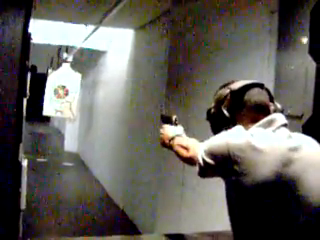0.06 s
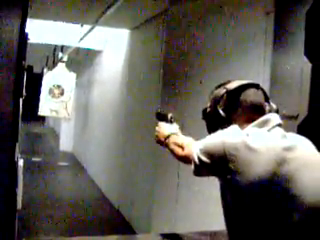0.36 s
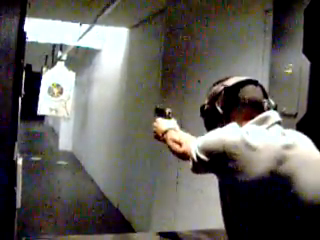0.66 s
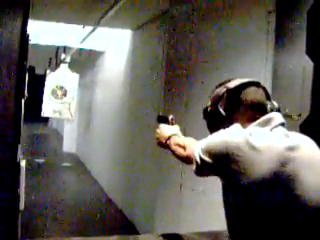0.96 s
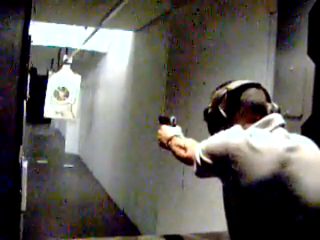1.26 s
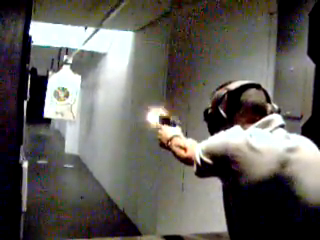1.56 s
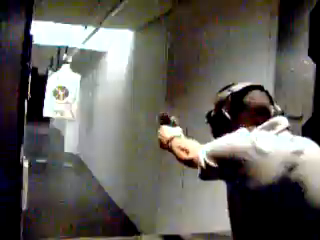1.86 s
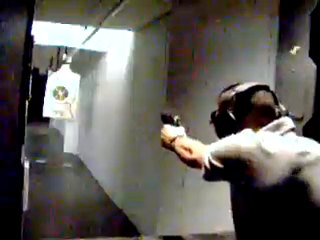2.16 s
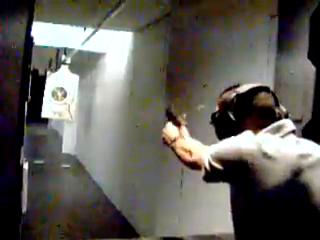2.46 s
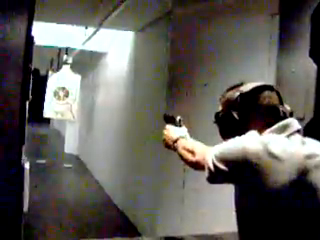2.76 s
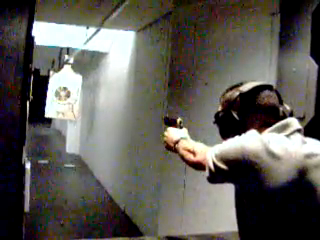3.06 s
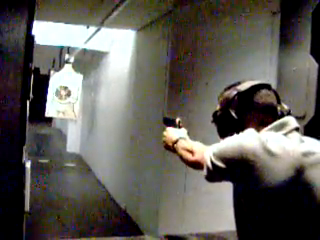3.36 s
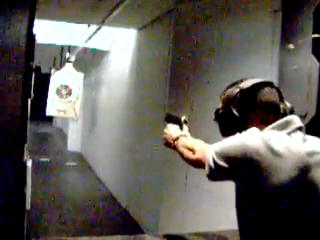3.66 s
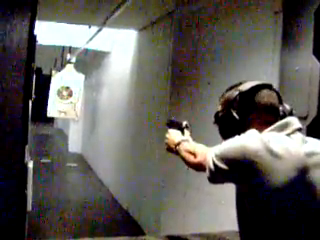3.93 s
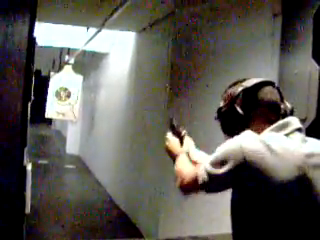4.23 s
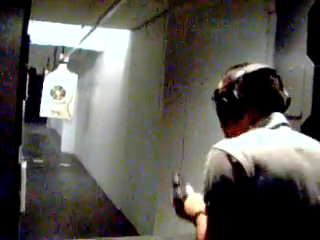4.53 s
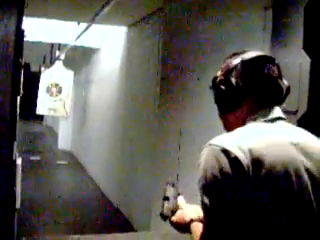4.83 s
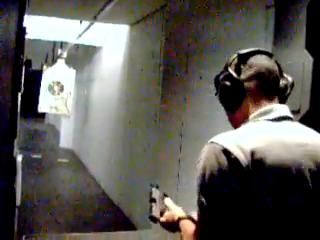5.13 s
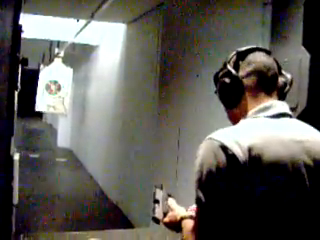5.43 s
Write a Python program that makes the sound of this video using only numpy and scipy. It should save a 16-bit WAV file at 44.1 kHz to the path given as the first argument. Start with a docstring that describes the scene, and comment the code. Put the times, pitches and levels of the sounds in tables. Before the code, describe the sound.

Close pistol shots overload a small, muffled microphone in an indoor shooting range. Six blasts come unevenly, two in quick succession, each echoing off concrete for about a second. Ejected cases hit the booth panels and the floor in between. The firing stops, the gun gives a short steel clack, and quiet ventilation keeps running.

```python
"""Pistol shots in an indoor range

A pistol is fired six times in a concrete range, a step from a small camera; the first shot is already
ringing. Each blast reflects round the booth, sets thin metal ringing and rolls back from the long lane,
overloading the camera's 8 kHz sound track. Spent cases strike the panels and the floor, the pistol's
action clacks as it is lowered, and the ventilation runs throughout."""
import sys
import numpy as np
from scipy import signal
from scipy.fft import rfft, irfft
from scipy.io import wavfile
from scipy.ndimage import uniform_filter1d

SR = 44100
rng = np.random.default_rng(int(sys.argv[2]) if len(sys.argv) > 2 else 0)


def materialize(psi):
    """Save the field psi as 16-bit PCM at rate SR to the path in sys.argv[1].

    A 1-D psi becomes a single channel; in a 2-D psi each row is a channel.
    """
    bounded = np.clip(np.atleast_2d(psi).T, -1, 1)
    quanta = np.round(bounded * 32767).astype(np.int16)
    wavfile.write(sys.argv[1], SR, quanta)


N = 250929


def amp(db):
    """Amplitude ratio: a factor of ten for every 20 dB."""
    return 10 ** (np.asarray(db) / 20)


def unit(x):
    """Normalisation to rms 1."""
    return x / np.sqrt(np.mean(x ** 2) + 1e-20)


def decay(t, t60):
    """Exponential damping: 60 dB are lost in t60 seconds."""
    return np.exp(-np.log(1000) * t / t60)


def curve(points, hz):
    """Linear interpolation of (frequency, value) points on a log-frequency axis."""
    knots_hz, values = np.transpose(points)
    return np.interp(np.log(hz + 1), np.log(knots_hz + 1), values)


def colour(white, spectrum):
    """Spectral shaping: white noise takes on the given spectrum, at rms 1."""
    hz = np.fft.rfftfreq(len(white), 1 / SR)
    return unit(irfft(rfft(white) * amp(curve(spectrum, hz)), len(white)))


def impact(db, centre_hz, octaves, t60):
    """Resonance of a struck body: a dying burst of noise passes through one frequency band."""
    t = np.arange(SR // 2) / SR
    low, high = centre_hz * 2 ** (np.array([-.5, .5]) * octaves)
    body = signal.butter(2, [low, high], "bandpass", fs=SR, output="sos")
    rattle = rng.standard_normal(len(t)) * decay(t, t60)
    bandwidth_gain = np.sqrt(SR / 2 / (high - low))
    return amp(db) * bandwidth_gain * signal.sosfilt(body, rattle)


def ventilation(air_db=-45, waver_hz=2.5):
    """Broadband flow noise from the ducts lies under fan tones that waver in pitch."""
    # spectrum of the rushing air: frequency_hz, relative_density_db
    air_spectrum = [(15, -2.5), (35, -3.5), (70, -8.5), (180, -9), (300, -10.5), (480, -14.5), (620, -11.5),
                    (950, -15), (1300, -22), (2200, -24.5), (3000, -26.5), (4000, -25)]
    # tones of the fans: pitch_hz, level_db
    fan_tones = [(48, -62), (177, -62), (366, -67.5), (640, -59), (770, -69.5)]
    out = amp(air_db) * colour(rng.standard_normal(N), air_spectrum)
    for hz, db in fan_tones:
        drift = waver_hz * unit(uniform_filter1d(rng.standard_normal(N), size=4000))
        out += amp(db) * np.sqrt(2) * np.sin(2 * np.pi * np.cumsum(hz + drift) / SR)
    return out


def spent_cases():
    """Impact excitation: a case thumps and clatters on a panel, or pings on the concrete floor."""
    # strikes on the booth's panels: start_s, thump_db, thump_hz, clatter_db
    knocks = [(1.0284, -15, 211, -16), (3.198, -23.5, 278, -38)]
    out = np.zeros(N)
    for start_s, thump_db, thump_hz, clatter_db in knocks:
        thump = impact(thump_db, thump_hz, octaves=.82, t60=.075)
        clatter = impact(clatter_db, centre_hz=1700, octaves=1.73, t60=.075)
        add(out, start_s, thump + clatter)
    ping = impact(db=-26, centre_hz=4100, octaves=.31, t60=.059)
    tick = impact(db=-36, centre_hz=2600, octaves=.9, t60=.059)
    add(out, start_s=1.3465, sound=ping + tick)
    return out


def chatter(start_s, db, length_s, gap_s=.0025, unevenness=.25, fade_db_per_s=100):
    """Contact chatter: steel parts meet at nearly even gaps, ever weaker. Gives (start_s, level_db)."""
    steps = np.arange(8)
    jitter = unevenness * rng.uniform(-1, 1, len(steps)) * (steps > 0)
    delays = gap_s * (steps + jitter)
    return [(start_s + delay, db - fade_db_per_s * delay) for delay in delays if delay < length_s]


def pistol_action(spread_db=5.5, detune=.087, lowest_hz=650, echo_db=-27, echo_t60=.45):
    """Modal ringing of hand-damped steel, echoed by the booth; parts this small radiate no bass."""
    # runs of contacts as the action is worked and handled: start_s, level_db, length_s
    clacks = [(4.4639, -25.5, .009), (4.476, -31.5, .006), (4.4912, -34.5, .005), (4.842, -50, .002),
              (4.919, -52, .002)]
    # modes of the action: pitch_hz, relative_level_db, t60_s
    steel_modes = [(846, -13, .06), (1010, -9, 0.067), (1480, 0, 0.017), (1650, -3, 0.033),
                   (1900, -4, 0.017), (2290, -1, .03), (2460, -13, 0.036), (2940, -19, 0.023),
                   (3660, -26, 0.048)]
    t, out = np.arange(SR // 2) / SR, np.zeros(N)
    hz, mode_db, t60 = np.transpose(steel_modes)[:, :, None]
    for clack in clacks:
        for start_s, db in chatter(*clack):
            # each contact point favours and detunes the modes in its own way
            strength, polarity, shift = rng.standard_normal((3, len(steel_modes), 1))
            modes = np.sin(2 * np.pi * hz * (1 + detune * shift) * t) * decay(t, t60)
            ring = (np.sign(polarity) * amp(mode_db + spread_db * strength) * modes).sum(0)
            diffuse = signal.fftconvolve(ring, rng.standard_normal(len(t)))[:len(t)]
            echo = amp(echo_db) * unit(diffuse) * decay(t, echo_t60)
            snap = impact(db=-5, centre_hz=2400, octaves=1.1, t60=.0095)
            add(out, start_s, amp(db) * (snap + ring + echo))
    return signal.sosfilt(signal.butter(2, lowest_hz, "highpass", fs=SR, output="sos"), out)


def echoes(paths, correlation):
    """Correlated reflections: the shooter hardly moves, so each shot's echoes largely repeat."""
    return correlation * paths + np.sqrt(1 - correlation ** 2) * rng.standard_normal(len(paths))


def reverberation(paths, spectrum, band_decays, stretch, rise_s):
    """Reflections build up, then each overlapping band dies in its own nominal t60 times stretch."""
    t, hz = np.arange(len(paths)) / SR, np.fft.rfftfreq(len(paths), 1 / SR)
    bins = rfft(colour(paths, spectrum))
    centres_hz, t60s = np.transpose(band_decays)
    weights = (curve(np.c_[centres_hz, pick], hz) for pick in np.eye(len(centres_hz)))
    bands = (irfft(bins * weight, len(t)) for weight in weights)
    tail = sum(band * decay(t, t60 * stretch) for band, t60 in zip(bands, t60s))
    return tail * (1 - np.exp(-t / rise_s))


def gunshots(blast_db=4.5, blast_s=.0061, metal_db=-3, booth_db=5.5, lane_db=13, hall_db=-19):
    """A Friedlander blast wave excites thin metal, early reflections and late reverberation."""
    # one row a shot: start_s, gain_db
    shots = [(-.125, -1.5), (.573, -1), (1.5399, -1.1), (1.8111, -1.07), (2.4589, -1), (3.5327, -1.3)]
    # modes of thin metal in the booth: pitch_hz, relative_level_db, t60_s
    metal_modes = [(1123, -7.5, 0.26), (1295, -11, .6), (1605, -16, 0.95), (1904, -10, 0.4),
                   (2150, -9, 0.29), (2276, -12.5, 0.7), (2790, -14.5, 0.98), (3560, -16, 0.26),
                   (3950, -26, 0.96)]
    # bright early reflections between the booth's walls: frequency_hz, relative_density_db
    booth_spectrum = [(15, 0), (55, -3), (110, 1.5), (200, 2), (500, -7), (900, -4), (1500, -3),
                      (2500, -7.5), (4000, -5.5)]
    # their decay: frequency_hz, nominal_t60_s
    booth_decays = [(40, 0.12), (300, 0.79), (1500, 0.51), (4000, 0.19)]
    # darker roar swelling back from the lane: frequency_hz, relative_density_db
    lane_spectrum = [(20, -25), (75, -23), (110, -12), (150, -15.5), (195, -9.5), (245, -12), (310, -4.5),
                     (500, 3.5), (950, 3), (1130, -3.5), (1400, -11), (2300, -13), (3100, -17), (4100, -16),
                     (6000, -41.5)]
    # its decay: frequency_hz, nominal_t60_s
    lane_decays = [(50, 0.56), (170, 1.054), (400, 0.94), (800, 0.95), (1500, 0.98), (2500, 0.94),
                   (4000, 0.78)]
    # faint, slow reverberation of the whole hall: frequency_hz, relative_density_db
    hall_spectrum = [(60, -8), (200, -5.5), (450, -7), (800, 3), (1300, -3.5), (2100, -4.5), (3200, -18),
                     (4000, -16.5), (6000, -44)]
    t, out = np.arange(2 * SR) / SR, np.zeros(N)
    near_paths, far_paths = rng.standard_normal((2, len(t)))
    blast = -amp(blast_db) * (1 - t / blast_s) * np.exp(-t / blast_s)  # suction, then overpressure
    metal = sum(amp(metal_db + db) * np.sin(2 * np.pi * hz * t) * decay(t, t60)
                for hz, db, t60 in metal_modes)
    for start_s, gain_db in shots:
        near, far = echoes(near_paths, correlation=.85), echoes(far_paths, correlation=.88)
        booth = reverberation(near, booth_spectrum, booth_decays, stretch=.95, rise_s=.00092)
        lane = reverberation(far, lane_spectrum, lane_decays, stretch=.96, rise_s=.093)
        hall = colour(rng.standard_normal(len(t)), hall_spectrum) * decay(t, t60=2.375)
        room = amp(booth_db) * booth + amp(lane_db) * lane + amp(hall_db) * hall
        add(out, start_s, amp(gain_db) * (blast + metal + room))
    return out


def scene():
    """Sound pressures sum at the camera's single microphone."""
    return (gunshots() + spent_cases() + pistol_action() + ventilation())[None]


def record(dry, track_hz=8000, overload=.69, knee=4.8, ceiling=.66, edge_hz=15850,
           bias=.22, settle_s=.0041, offset=-.013):
    """Saturation at a low sample rate; ripples overshoot on the return to full rate and clip to fizz."""
    hold = np.exp(-1 / (settle_s * SR))
    excess = np.maximum(abs(dry) - overload, 0)
    charge = signal.lfilter([1 - hold], [1, -hold], excess)
    shifted = dry + bias * charge + offset  # overload shifts the input's resting point
    antialias = signal.firwin(441 * 110 + 1, track_hz / 2 + 50, window=("kaiser", 9), fs=track_hz * 441)
    track = signal.resample_poly(shifted, track_hz, SR, axis=1, window=antialias)
    saturated = track / (1 + abs(track / overload) ** knee) ** (1 / knee)
    full_rate = signal.resample_poly(saturated, SR, track_hz, axis=1, window=antialias)[:, :N]
    clipped = np.clip(full_rate, -ceiling, ceiling)
    lowpass = signal.firwin(511, edge_hz, window=("kaiser", 9), fs=SR)
    return signal.oaconvolve(clipped, lowpass[None], "same")


def add(mix, start_s, sound):
    """Superposition: a sound joins the mix at start_s, which may be negative."""
    start = round(start_s * SR)
    sound = sound[max(-start, 0):]
    part = mix[max(start, 0):][:len(sound)]
    part += sound[:len(part)]


dry = scene()
out = record(dry)
materialize(out)
```